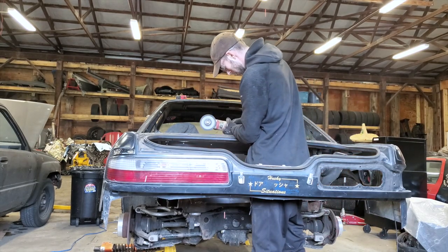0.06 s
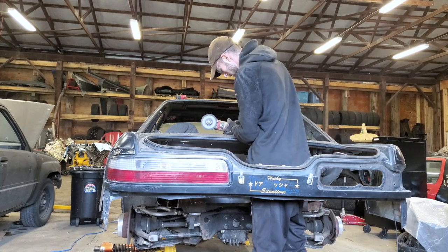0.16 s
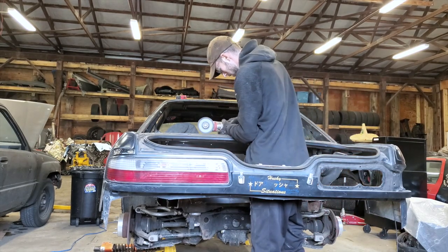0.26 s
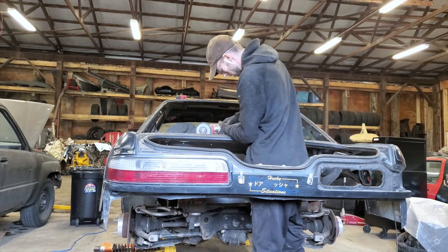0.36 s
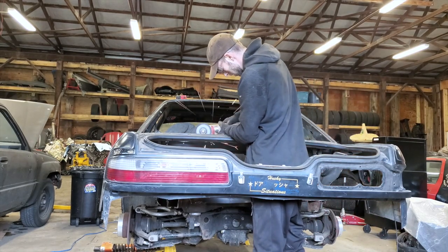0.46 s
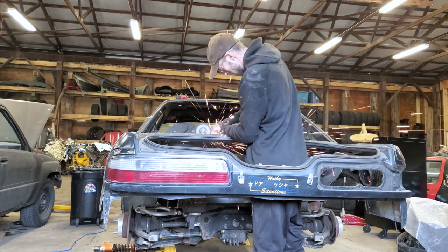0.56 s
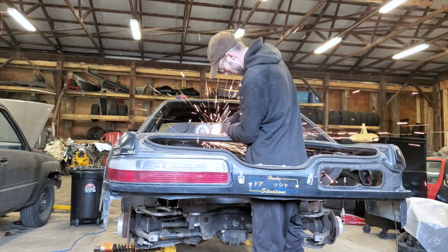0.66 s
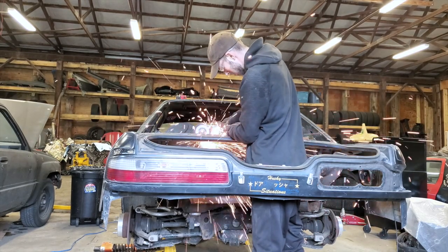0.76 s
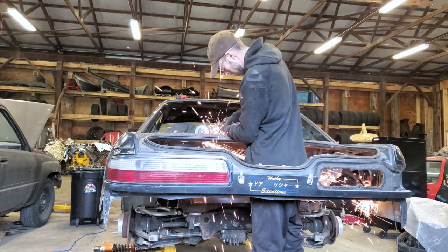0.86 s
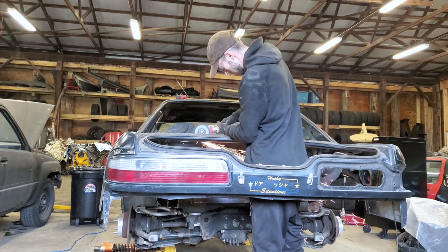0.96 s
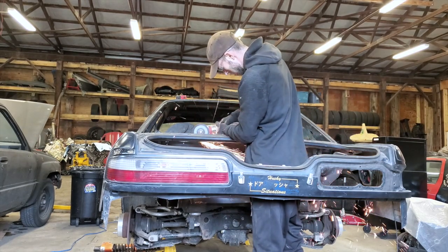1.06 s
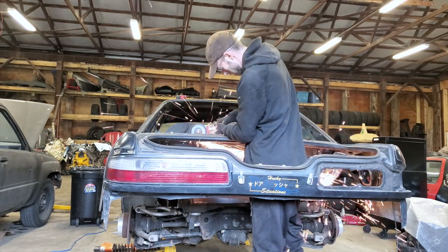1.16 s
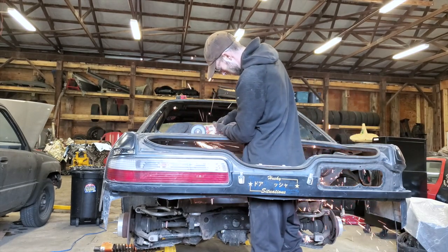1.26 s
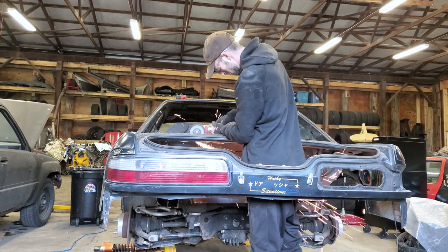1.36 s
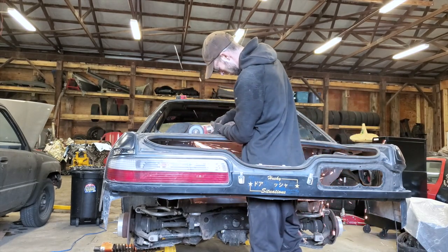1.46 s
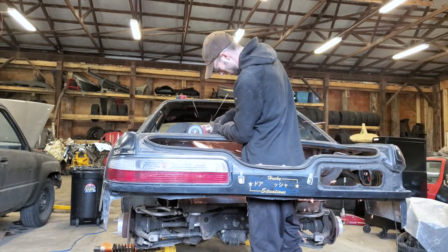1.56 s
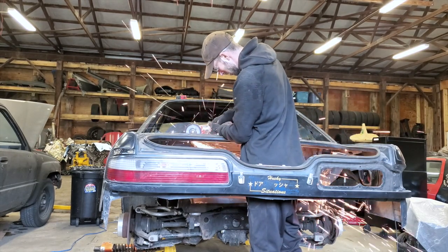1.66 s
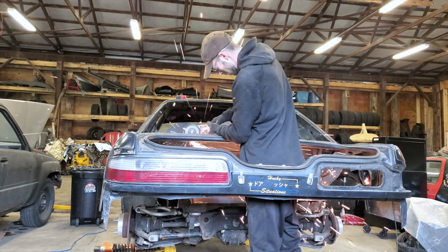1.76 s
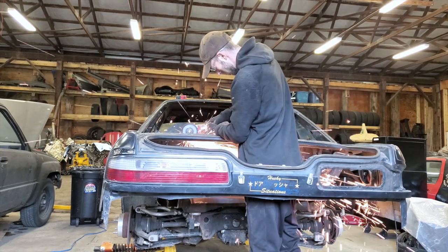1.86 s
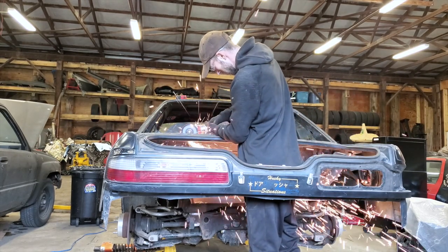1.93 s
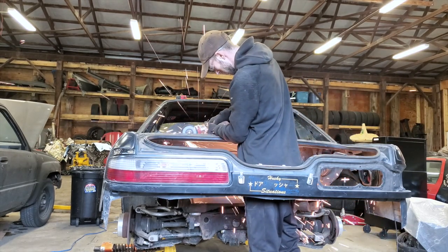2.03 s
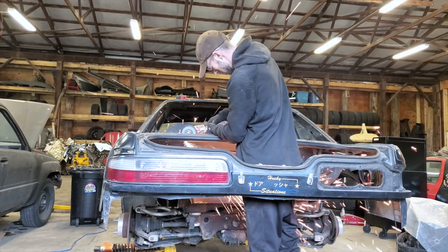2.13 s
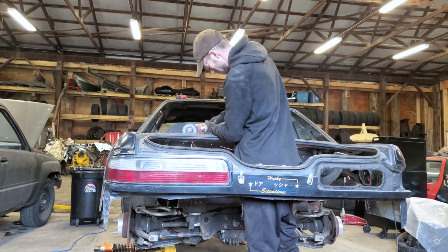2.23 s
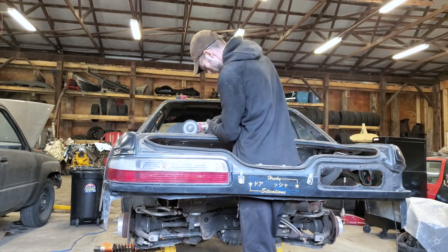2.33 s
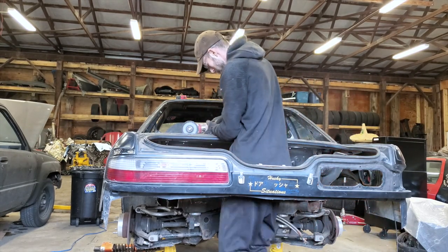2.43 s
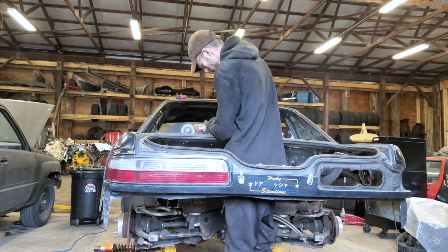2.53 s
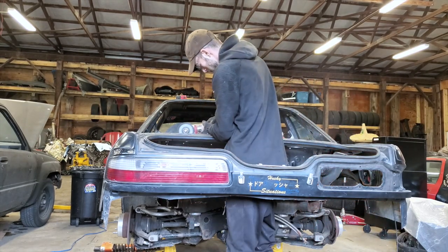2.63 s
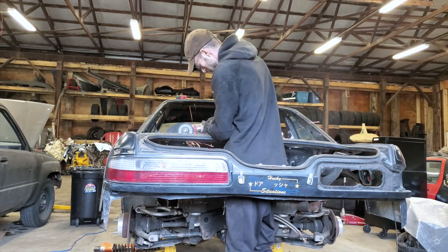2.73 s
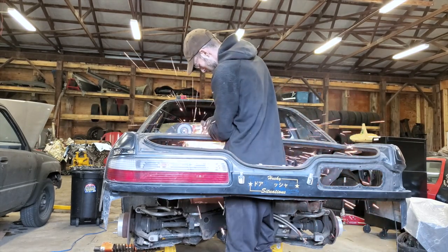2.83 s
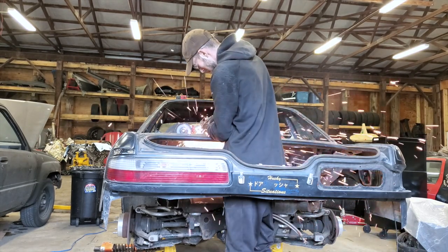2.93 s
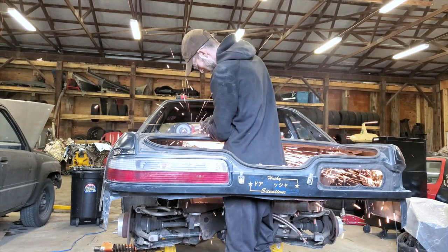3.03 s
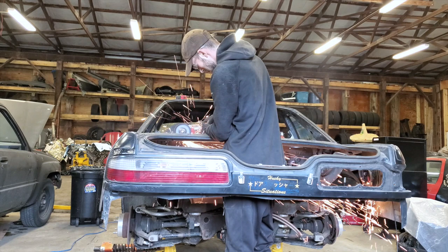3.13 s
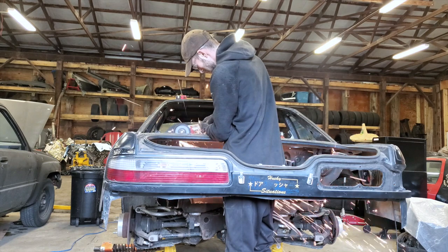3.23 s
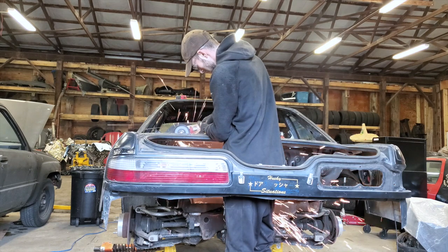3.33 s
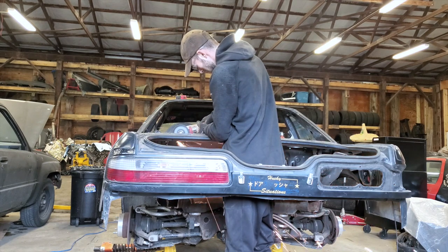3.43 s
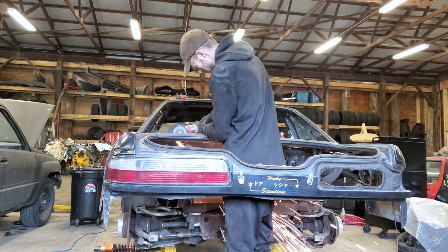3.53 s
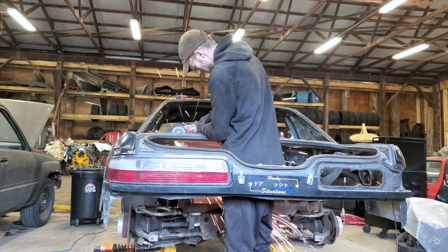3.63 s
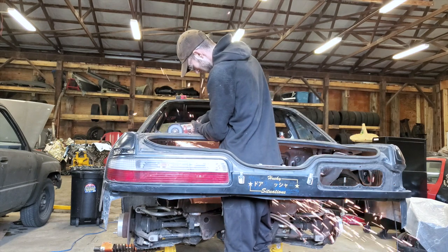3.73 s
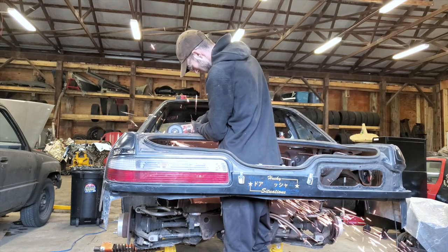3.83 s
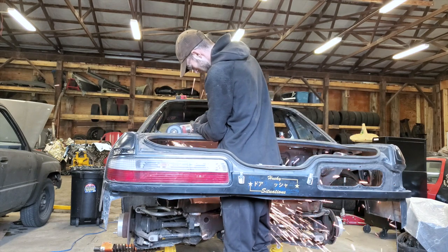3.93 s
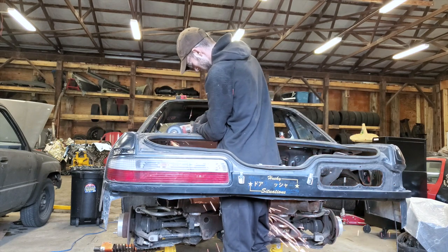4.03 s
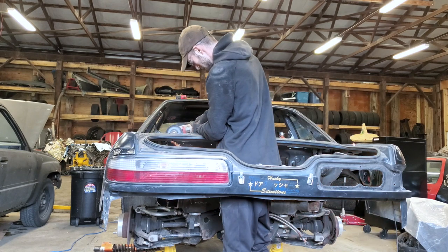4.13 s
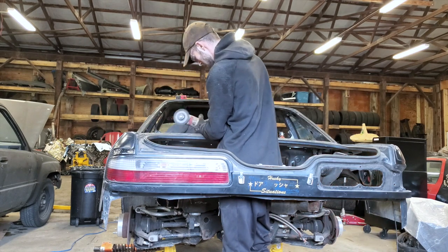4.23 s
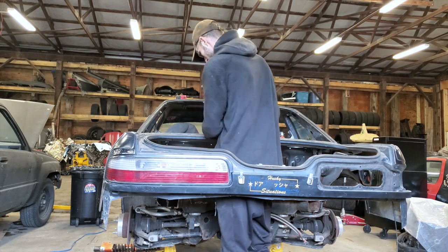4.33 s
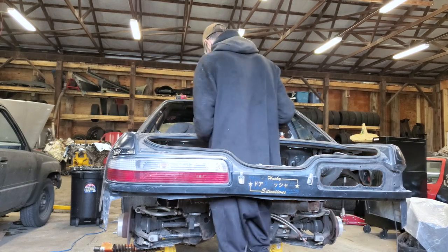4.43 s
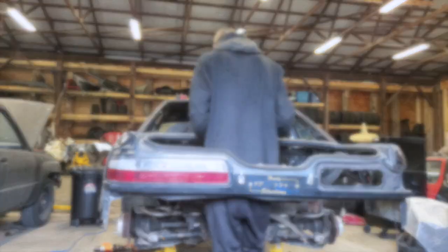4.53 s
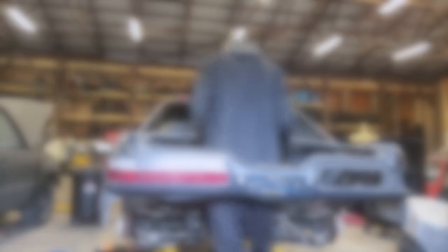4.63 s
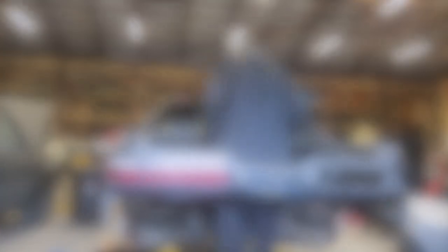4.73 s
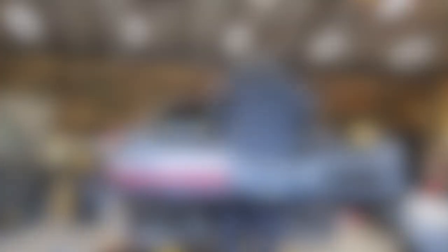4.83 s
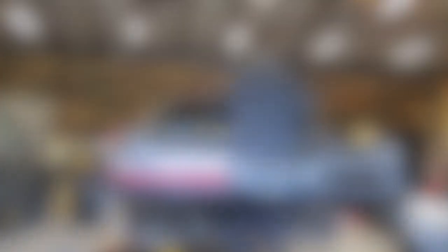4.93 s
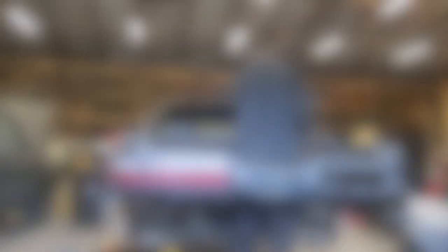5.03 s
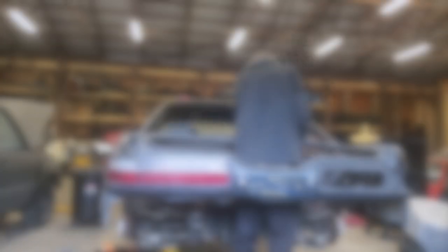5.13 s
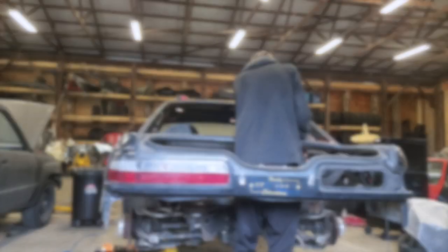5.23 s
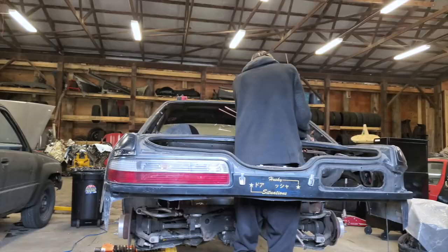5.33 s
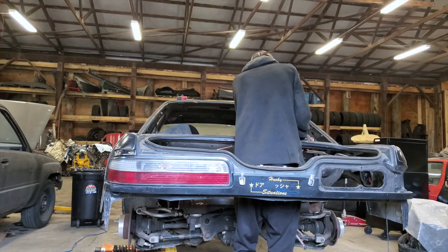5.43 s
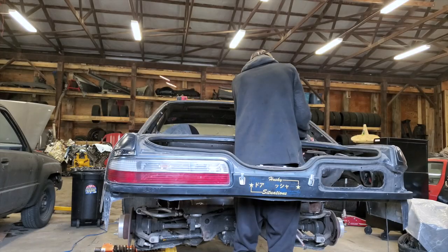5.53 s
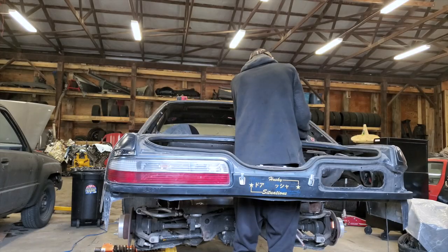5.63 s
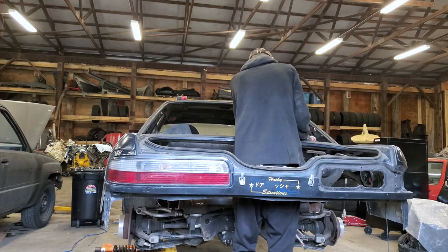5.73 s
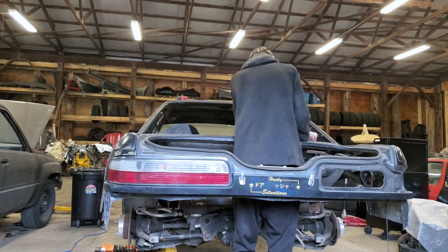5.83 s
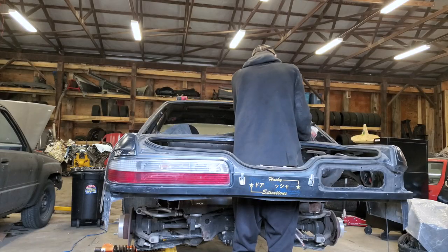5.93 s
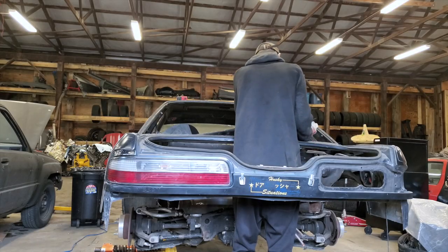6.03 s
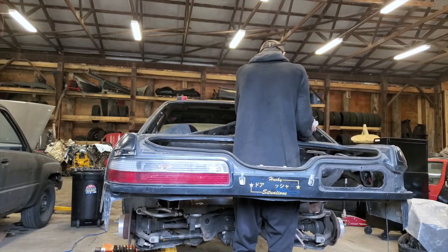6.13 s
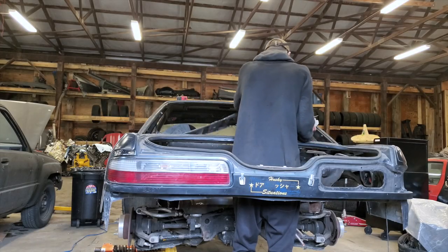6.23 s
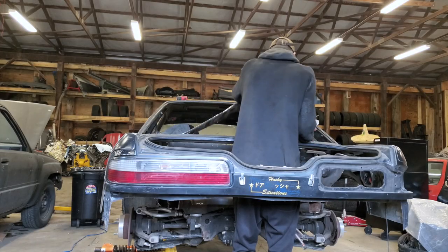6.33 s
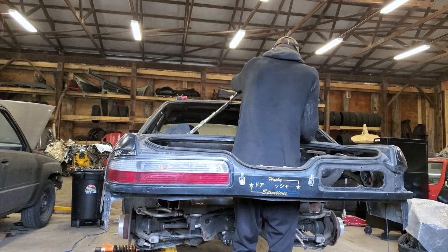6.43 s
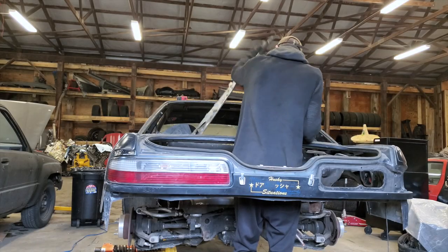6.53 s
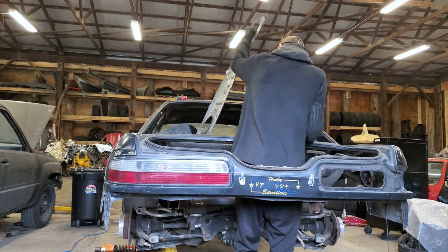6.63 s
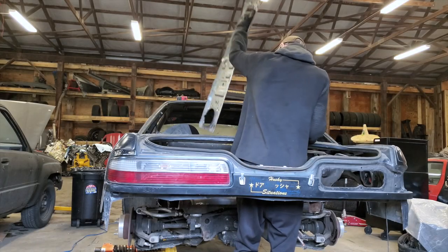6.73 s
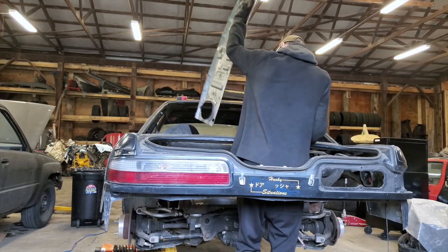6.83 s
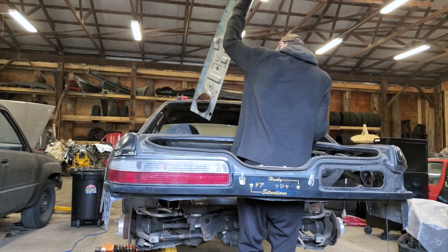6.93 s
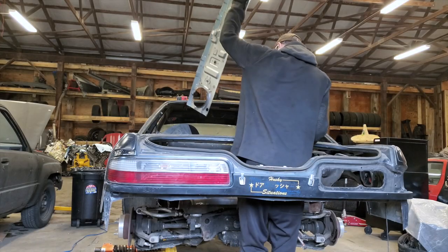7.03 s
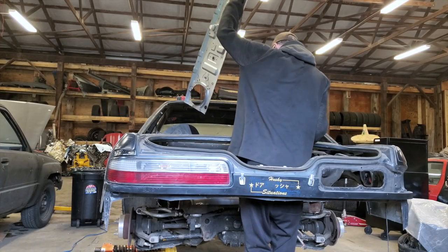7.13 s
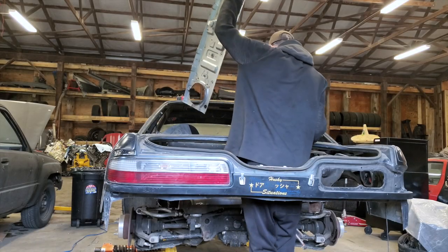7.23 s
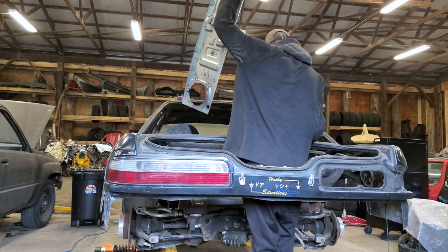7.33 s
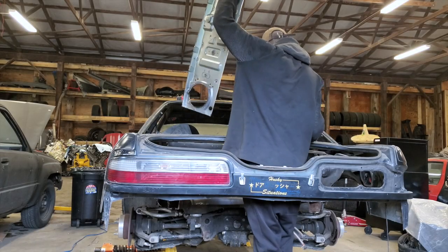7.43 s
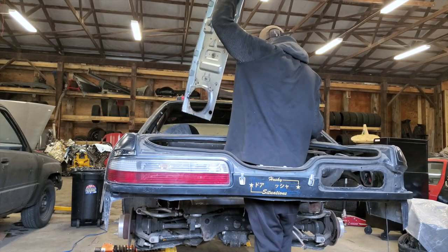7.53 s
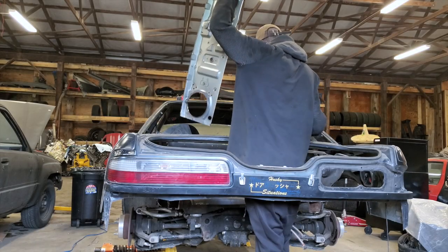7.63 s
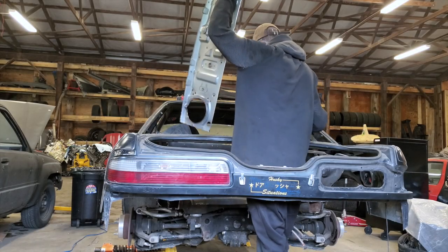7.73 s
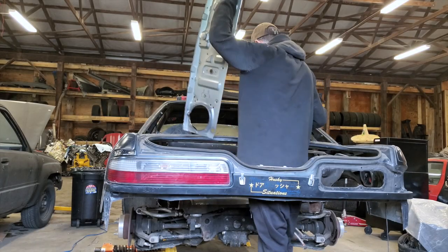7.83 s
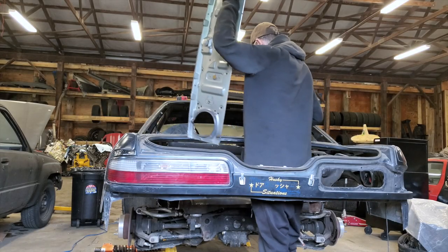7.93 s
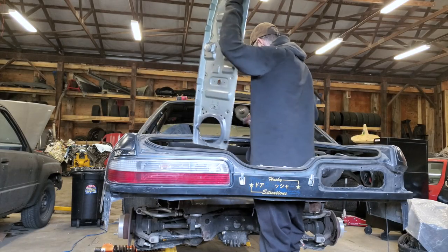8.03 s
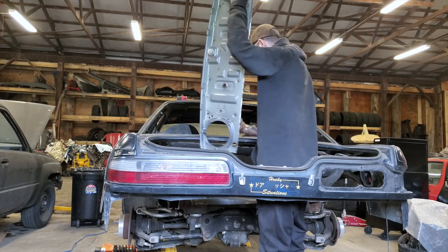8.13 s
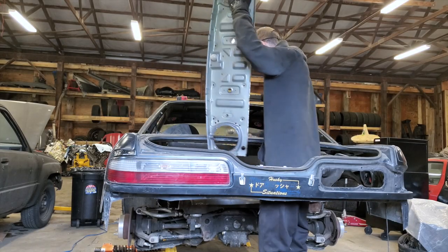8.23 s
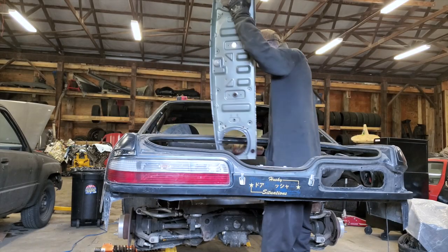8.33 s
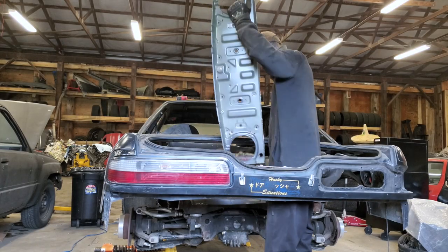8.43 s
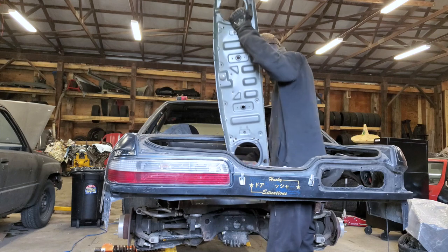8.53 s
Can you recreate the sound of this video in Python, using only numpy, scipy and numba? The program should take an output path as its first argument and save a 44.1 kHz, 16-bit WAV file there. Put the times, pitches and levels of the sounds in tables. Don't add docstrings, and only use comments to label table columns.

```python
import sys
import numpy as np
from scipy import signal
from scipy.fft import rfft, irfft, next_fast_len
from scipy.io import wavfile
from scipy.ndimage import uniform_filter1d, map_coordinates
from numba import njit

SR = 44100
rng = np.random.default_rng(int(sys.argv[2]) if len(sys.argv) > 2 else 0)


def voltage_ratio(decibels):
    exponent = np.asarray(decibels, float) / 20
    return 10 ** exponent


def output_pcm(signal):
    pcm = np.clip(np.atleast_2d(signal).T, -1, 1) * 32767
    wavfile.write(sys.argv[1], SR, np.round(pcm).astype(np.int16))


N = 377937

# start in seconds, disc turns in Hz, pressure as spark level in dB.
QUICK = [
    [(0, 469.8, -16.5), (.12, 500.7, -36), (.29, 445, -35), (.36, 554.7, -26), (.44, 600, -21)],
    [(0.5, 631.3, -17.0), (0.57, 633.5, -14.5), (0.64, 620.9, -19.5), (0.67, 613.2, -18.0),
     (0.79, 539.6, -17.0), (0.91, 504.1, -20.5), (0.94, 503.9, -20.5), (1.01, 546.9, -23.5)],
    [(1.06, 558.0, -22.0), (1.16, 528.3, -22.0), (1.24, 466.1, -20.5), (1.27, 457.6, -21.0),
     (1.33, 464.8, -22.5), (1.36, 503.9, -22.0), (1.41, 522.6, -22.5), (1.45, 524.4, -22.0)],
    [(1.49, 511.5, -23.0), (1.63, 546.5, -24.0), (1.73, 496.8, -22.5), (1.84, 488.6, -24.5),
     (1.97, 440.8, -23.0), (2.07, 461.4, -22.5), (2.21, 454.0, -25.0), (2.26, 463.6, -29.0)],
    [(2.31, 516, -34), (2.53, 642.2, -32.5), (2.61, 660, -22)],
    [(2.66, 654.0, -22.0), (2.81, 644.5, -21.0), (3.01, 504.7, -20.0), (3.16, 456.8, -22.5),
     (3.3, 463.5, -22.0), (3.44, 495.3, -22.0), (3.51, 527.2, -23.0), (3.66, 529.9, -25.5),
     (3.72, 515.4, -24.5)],
    [(3.79, 461.3, -21.5), (3.83, 443.5, -21.5), (3.96, 436.9, -23.0), (4.03, 399.3, -20.5),
     (4.1, 411.8, -24.0), (4.13, 443.0, -25.5), (4.21, 490.3, -28.5), (4.25, 495.4, -30.5)],
    [(4.36, 493, -37.5), (4.52, 450, -35), (4.62, 426.3, -29), (4.79, 420, -31), (4.87, 415, -36)],
]
# start in seconds, disc turns in Hz, pressure as spark level in dB.
SLOW = [
    [(4.5, 171.4, -53.5), (4.73, 166, -31.5), (4.88, 163.5, -27), (5.11, 161.6, -19), (5.21, 159.6, -26),
     (5.4, 157.3, -17.5), (5.63, 152.5, -21), (5.76, 151.3, -42), (5.95, 150, -37)],
]
# frequency in Hz, level in dB per Hz.
QUICK_STEEL = [(150, -41), (250, -23), (467, -27), (509, -13.5), (696, -18), (857, -12), (1420, -10.5),
               (1900, -4.5), (2300, -7.5), (2650, 0.5), (3880, -7), (4300, -4.5), (6640, -9.5), (8910, -3),
               (15800, -6)]
# frequency in Hz, level in dB per Hz.
SLOW_STEEL = [(65, -58), (110, -43), (157, -11.5), (237, -16), (317, -4.5), (360, -15.5), (471, -3),
              (568, -12), (617, -9), (936, -5.5), (1020, -9), (3470, 7.5), (4900, 2), (5600, -9),
              (6400, -3), (8120, -6), (15800, -2)]
# frequency in Hz, width in Hz, level in dB.
QUICK_MODES = [(2730, 150, -3), (3729, 80, -1), (4400, 200, -1), (9120, 920, -20)]
# frequency in Hz, width in Hz, level in dB.
SLOW_MODES = [(8290, 410, 3.6), (11810, 480, 1.75), (14670, 990, 4.74)]
# frequency in Hz, likeness from 0 to 1.
QUICK_ALIKE = [(60, .97), (240, .96), (950, .95), (3770, .76), (8000, .6), (15000, .2)]
# frequency in Hz, likeness from 0 to 1.
SLOW_ALIKE = [(150, .995), (300, .97), (600, .78), (2000, .8), (5500, .9), (9000, .75), (15000, .45)]
# sheet level in dB, its dB per dB of pressure, low level in dB, its dB per dB.
QUICK_LAYERS = (-33, 1.0679, -49, 1.3)
# sheet level in dB, its dB per dB of pressure, low level in dB, its dB per dB.
SLOW_LAYERS = (-32, 0.47, -39.5, 0.4329)
# centre in seconds, length in
# seconds, multiple of disc speed, level in dB.
QUICK_SCREECH = [(.05, .1, 1, -42), (.06, .12, 2, -41),
                 (0.56, 0.18, 16, -27), (0.57, 0.17, 5, -32), (0.57, 0.2, 13, -26), (0.59, 0.26, 4, -31),
                  (0.6, 0.29, 14, -27), (0.68, 0.12, 9, -31), (0.68, 0.18, 3, -36), (0.71, 0.2, 2, -44),
                  (0.71, 0.63, 8, -35), (0.73, 0.12, 13, -29), (0.73, 0.17, 10, -34), (0.75, 0.11, 1, -44),
                  (0.75, 0.12, 6, -33), (0.77, 0.38, 16, -32), (0.78, 0.11, 9, -33), (0.8, 0.18, 14, -25),
                  (0.83, 0.09, 7, -33), (0.96, 0.38, 1, -46), (1.07, 0.36, 2, -48), (1.15, 0.17, 7, -35),
                  (1.27, 0.17, 6, -35), (1.29, 0.14, 7, -32), (1.29, 0.18, 8, -35), (1.39, 0.15, 17, -33),
                  (1.42, 0.18, 16, -31), (1.44, 0.12, 7, -34), (1.49, 0.41, 1, -48), (1.51, 0.17, 5, -35),
                  (1.51, 0.18, 10, -37), (1.58, 0.14, 7, -35), (1.6, 0.21, 4, -41), (1.63, 0.15, 5, -30),
                  (1.76, 0.21, 17, -33), (1.78, 0.2, 5, -33), (1.81, 0.17, 9, -28), (1.82, 0.21, 10, -37),
                  (1.91, 0.11, 8, -38), (1.92, 0.15, 6, -35), (1.94, 0.14, 4, -39), (1.95, 0.11, 9, -33),
                  (1.99, 0.17, 10, -34), (2.01, 0.31, 18, -34), (2.09, 0.22, 9, -36), (2.19, 0.12, 6, -31),
                 (2.75, 0.15, 18, -33), (2.77, 0.16, 15, -31), (2.77, 0.19, 3, -36), (2.77, 0.25, 4, -36),
                 (2.78, 0.25, 2, -48), (2.83, 0.48, 14, -32), (2.92, 0.15, 8, -35), (2.97, 0.28, 5, -32),
                 (2.99, 0.25, 7, -36), (3.02, 0.12, 1, -43), (3.02, 0.18, 11, -32), (3.02, 0.24, 9, -33),
                 (3.03, 0.24, 15, -31), (3.04, 0.22, 10, -28), (3.06, 0.37, 4, -43), (3.15, 0.28, 17, -34),
                 (3.18, 0.13, 10, -34), (3.2, 0.18, 7, -39), (3.31, 0.19, 10, -32), (3.39, 0.21, 16, -32),
                 (3.56, 0.16, 9, -37), (3.59, 0.16, 5, -39), (3.63, 0.57, 1, -47), (3.7, 0.25, 18, -34),
                 (3.73, 0.18, 2, -48), (3.8, 0.13, 6, -35), (3.86, 0.12, 18, -28), (3.87, 0.24, 3, -42),
                 (3.88, 0.12, 10, -31), (3.88, 0.21, 2, -41), (3.93, 0.18, 6, -35), (3.93, 0.27, 1, -49),
                 (3.97, 0.09, 10, -32), (4.03, 0.1, 11, -29), (4.07, 0.18, 2, -42), (4.09, 0.1, 9, -33),
                 (4.11, 0.24, 6, -41), (4.11, 0.27, 3, -44), (4.17, 0.19, 1, -47), (4.2, 0.15, 2, -50)]
# centre in seconds, length in seconds, multiple, level in dB.
SLOW_SCREECH = [(5.1, .25, 2, -43.5), (5.09, .19, 8, -33), (5.1, .22, 7, -36), (5.12, .1, 21, -33),
                (5.27, .25, 15, -38), (5.37, .15, 22, -39), (5.46, .245, 6, -33), (5.58, .15, 5, -38),
                (5.22, .4, 1, -42), (5.43, .3, 1, -48), (5.63, .12, 1, -47), (5.11, .2, 4, -43),
                (5.42, .26, 4, -39), (5.66, .14, 4, -40), (5.13, .3, 3, -43), (5.55, .3, 3, -43),
                (5.38, .12, 9, -40)]
# in at seconds, out at seconds, share repeating each turn 0-1, seating in seconds.
KERF = [
    (-.2, .14, .8, .1),
    (.45, 2.28, .86, .15),
    (2.62, 4.3, .89, .25),
    (4.86, 5.74, .6, .19),
]
# centre in seconds, length in seconds, share of grip lost from 0 to 1.
SLIPS = [
    (1.046, .28, .35),
    (1.362, .1, .25),
    (3.58, .32, .27),
    (4.07, .2, .4),
    (5.24, .15, .35),
]
# time in seconds, frequency in Hz, level in dB.
ROTOR = [
    [(2.33, 520, -56), (2.53, 642, -52), (2.61, 660, -50), (2.78, 650, -52)],
    [(.42, 590, -50), (.5, 631, -45), (.66, 616, -46)],
    [(.07, 1750, -43), (.29, 1290, -60.5), (.36, 1703, -38), (.5, 1890, -38)],
    [(2.27, 1394, -56), (2.36, 1760, -48), (2.5, 1870, -51.5), (2.7, 1960, -45)],
    [(4.24, 1750, -38), (4.34, 1640, -52.5), (4.42, 1457, -51), (4.64, 1060, -60)],
]
# frequency in Hz, level in dB per Hz.
AIR_COLOUR = [(65, -50), (110, -39.5), (147, -17), (342, -16.5), (429, -4), (538, -8.5), (1200, 1.5),
              (2100, -3.5), (3110, -0.5), (5420, -17), (15200, -15.5)]
# time in seconds, effort in dB.
DRAG = [
    (6.2, -39),
    (6.62, -46),
    (7.15, -41),
    (7.85, -38),
    (8.17, -45),
    (8.57, -43.5),
]
# frequency in Hz, width in Hz, level in dB.
PANEL = [
    [(1870, 320, -7.5), (2428.4, 140, 4), (2720, 230, 3), (3430, 730, -9), (4334, 1490, -10)],
    [(413, 239, -7.5), (686, 202, -1.5), (889.3, 120, 1), (1199, 90, -1.5), (1452, 166, -2.5)],
]
# frequency in Hz, width in Hz, level in dB.
FLANGE = [(1000, 250, -4), (1520, 200, 0), (1840, 200, -4), (3700, 700, -4)]
# frequency in Hz, level in dB.
RING = [(893.6, -57.5), (1061, -59), (1179, -46)]
# time in seconds, peak in dB, thud in dB, squeak in dB.
KNOCKS = [(6.657, -29, -40, -35), (7.2888, -23.5, -40.5, -33.5), (7.342, -25, -40, -35),
          (7.3619, -24, -40, -35), (7.7969, -26, -40, -35), (8.0389, -24, -40, -25),
          (8.1252, -26, -40, -35), (8.1651, -24, -40, -30), (7.6689, -22, -18.5, -33),
          (7.8189, -26, -19, -32), (7.8778, -16, -27, -39), (8.075, -21, -31.5, -28),
          (8.1802, -25, -27.5, -8), (8.396, -22, -26, -27), (8.4398, -17.5, -37, -32)]
# time in seconds, level in dB, seconds to fade 10 dB.
SCRAPES = [(6.55, -40, .05), (7.22, -34, .45), (7.82, -36, .05), (7.88, -33.5, .1), (7.98, -38, .05),
           (8.19, -35, .06), (8.3, -38, .08), (8.42, -32.5, .1), (8.55, -35, .1)]
# time in seconds, level in dB, seconds to fade 10 dB.
SCUFFS = [(6.84, -43, .04), (7.19, -42, .1), (7.63, -40, .06), (7.92, -41, .08), (8.09, -42, .05),
          (8.22, -38, .06), (8.46, -39, .1)]
# time in seconds, hum level in dB.
HUM = [
    (4.45, -100),
    (4.75, -72.5),
    (5.4, -71),
    (6.85, -72),
    (7.15, -57),
    (8.57, -47.5),
]
# frequency in Hz, level in dB per Hz.
RUMBLE = [(13, -39), (22, -21), (50, 4.5), (75, 1), (100, -11), (140, -11), (180, -52), (310, -120)]
# frequency in Hz, level in dB per Hz.
SHOP = [(13, -51), (22, -23), (92, -15), (210, -4.5), (249, -5), (306, 1.5), (350, -10.5), (400, -2),
        (520, -9.5), (880, -120)]
# frequency in Hz, time to fade 60 dB in seconds.
HALL = [(150, 0.027), (450, 0.1), (2000, 1), (12000, 0.258)]

FIRM_DB, INERTIA_S = -22, 0.024
SEAT_S, LIFT_S = 0.173, 0.0766
CLEARED_S, CLEARED_DB = 3.616, 4
RATTLE_S, RATTLE_DB = 3.98, 4.5
RIPPLE_DB, RIPPLE_HZ = 4.2, 50
CLEAR, CLEAR_HZ = 0.46, (1700, 7000)
GUARD_HZ, GUARD_WIDTH_HZ = 9700, 1170
BASS_ALIKE_HZ = 700
FAN_ORDER = 39
COAST_S, FAN_HZ, SLOWS_S, COAST_END_S = 5.8, 17410, 2.6, 7.7
WHINE_DB, WHINE_FROM_S, WHINE_FADE_DB_PER_S, WHINE_RISE_DB_PER_S = -44.5, 6.5, 24, 14
AIR_S, AIR_DB, AIR_FADE_DB_PER_S = 5.6, (-34.5, -38), 11
SHOP_HISS_DB, SHOP_BODY_DB = -42, -36.5
STIR = 0.48
EDGE_DB, FLEX_DB = -1.5, 4
CATCH_S = 0.05
RUMBLE_DB, RUMBLE_FOLLOWS = -63, 0.59
DRONE_DB = -72.5
DRONE_LINE = (-2.1, 3, -61, 7.5)
TOP_HZ = 15800


def quick_passes():
    sound = cut(QUICK, QUICK_LAYERS, QUICK_STEEL, QUICK_MODES, QUICK_ALIKE, wear=44, flutter=0.0035,
                uneven_db=1.5, chatter_db=1.5, grit_top_db=-6.5, guard_db=5.5, wobble_db=-14, count=44)
    events = QUICK_SCREECH
    sound = sound + screech(QUICK, events, rough_db=3, apart=0.6)
    sound = sound * np.clip((QUICK[-1][-1][0] - np.arange(N) / SR) / 0.089, 0, 1)
    for rows in ROTOR:
        hz, db = curves(rows)
        sound = sound + voltage_ratio(db - 7 + 4 * wobble(25)) * window(rows, 0.03) * tone(hz, 0.008)
    return placed(sound, pan_db=-1.5, lag=0)


def slow_pass():
    sound = cut(SLOW, SLOW_LAYERS, SLOW_STEEL, SLOW_MODES, SLOW_ALIKE, wear=18, flutter=0.002,
                uneven_db=1.5, chatter_db=1.1, grit_top_db=-1, guard_db=0, wobble_db=-18, count=120)
    sound = sound + screech(SLOW, SLOW_SCREECH, rough_db=2, apart=0.54)
    bite = voltage_ratio(-5 * (np.arange(N) < 4.86 * SR))
    return placed(sound * bite * window(SLOW[0], 0.2), pan_db=-3.7, lag=4)


def cut(strokes, layers, steel, modes, alike, wear, flutter, uneven_db, chatter_db,
        grit_top_db, guard_db, wobble_db, count):
    t = np.arange(N) / SR
    turns_hz, pressure_db = hand(strokes)
    firmness_db = pressure_db - FIRM_DB
    sheet_db = layers[0] + layers[1] * firmness_db
    low_db = layers[2] + layers[3] * firmness_db
    low_db = low_db + CLEARED_DB * np.clip((t - CLEARED_S) / SEAT_S, 0, 1) - sheet_db
    sheet_db = sheet_db + RATTLE_DB * window([[RATTLE_S], [KERF[2][1]]], LIFT_S)
    sparks_db = pressure_db - sheet_db

    share = grip()
    span = (strokes[0][0][0], strokes[-1][-1][0])
    blows = filtered(rim(turns_hz, span, wear, flutter, uneven_db, count), ripple)
    grit = loose_grit(share, grit_top_db, guard_db)
    drive = spread(np.sqrt(share) * blows + np.sqrt(1 - share) * grit, alike)

    def body(hz):
        return voltage_ratio(along(steel, hz)) * (1 + np.abs(resonances(modes)(hz)))

    def part(lo, hi):
        band = filtered(drive, lambda hz: body(hz) * (below(hz, hi) - below(hz, lo)))
        return even(band, size=3000)

    def bounce():
        return chatter_db * (0.364 * wobble(16) + wobble(42))

    mix = voltage_ratio(bounce() - 1.0) * part(1373, 6960)
    mix = mix + voltage_ratio(low_db) * part(10, 1506)
    mix = mix + voltage_ratio(sparks_db + bounce()) * part(5387, 33200)
    once_db = low_db + wobble_db + 4 * wobble(15)
    mix = mix + (0.27 + share) * voltage_ratio(once_db) * tone(turns_hz, 0.0019)
    return voltage_ratio(sheet_db + 0.318 * bounce()) * mix


def loose_grit(share, grit_top_db, guard_db):
    def colour(hz):
        guard = guard_db * np.exp(-((hz - GUARD_HZ) / GUARD_WIDTH_HZ) ** 2)
        return voltage_ratio(grit_top_db * (0.5 - below(hz, 13000)) + guard)

    grit = filtered(rng.standard_normal((2, N)), colour)
    middle = filtered(grit, lambda hz: below(hz, CLEAR_HZ[1]) - below(hz, CLEAR_HZ[0]))
    return grit - CLEAR * share * middle


def rim(turns_hz, span, wear, flutter, uneven_db, count):
    a, b = round(span[0] * SR), round(span[1] * SR)
    hz = (turns_hz * (1 + flutter * wobble(60)))[a:b]
    shape = rng.standard_normal((count, 2, 300)) + 1j * rng.standard_normal((count, 2, 300))
    uneven = uniform_filter1d(rng.standard_normal((count, 1, 300)), size=3) * 1.7
    shape = shape * voltage_ratio(uneven_db * uneven)
    lines = orders(shape, rng.random(count), hz, wear / SR, 2.5 / count, 18000., SR)
    return np.pad(unit(lines) * np.sqrt(18000 / 22050), ((0, 0), (a, N - b)))


@njit
def orders(shape, offset, hz, wear_step, finer, top_hz, rate):
    out, phase = np.zeros((2, len(hz))), 0.
    for n in range(len(hz)):
        phase += 2 * np.pi * hz[n] / rate
        turn, power = np.exp(1j * phase), 1 + 0j
        for k in range(min(len(offset), int(top_hz / hz[n]))):
            power *= turn
            place = n * wear_step * (1 + k * finer) + offset[k]
            j = int(place) % (shape.shape[2] - 1)
            part = place % 1
            for c in range(2):
                out[c, n] += ((shape[k, c, j] * (1 - part) + shape[k, c, j + 1] * part) * power).real
    return out


def screech(strokes, events, rough_db, apart):
    phase = 2 * np.pi * np.cumsum(hand(strokes)[0]) / SR
    tremble, out = rough_db * wobble(35), np.zeros((2, N))
    chances = rng.standard_normal((len(events), 3))
    for (s, length, order, db), (shift, lean, start) in zip(events, chances):
        a, n = round((s - length / 2) * SR), round(length * SR)
        unsteady_db = np.roll(tremble, round(start * SR))[a:a + n]
        swell = np.sqrt(2) * voltage_ratio(db + unsteady_db) * np.hanning(n) ** 0.78
        mean_hz = order * (phase[a + n] - phase[a]) / (2 * np.pi * length)
        side = np.array([[1], [-1]]) * min(mean_hz / BASS_ALIKE_HZ, 1) ** 2
        wave = np.sin(round(order) * phase[a:a + n] + apart * shift * side + start)
        out[:, a:a + n] += swell * voltage_ratio(0.31 * lean * side) * wave
    return out * np.clip(2 * grip() - 0.1, 0, 1)


def hand(strokes):
    hz, pressure_db = curves(sum(strokes, []))
    return uniform_filter1d(hz, size=round(INERTIA_S * SR)), pressure_db


def grip():
    t = np.arange(N) / SR
    held = sum(share * np.clip((t - a) / seat, 0, 1) * np.clip((b - t) / LIFT_S, 0, 1)
               for a, b, share, seat in KERF)
    skid = sum(lost * np.exp(-(2 * (t - s) / length) ** 4) for s, length, lost in SLIPS)
    return np.clip(held * (1 - skid), 0, 1)


def ripple(hz):
    bumps = map_coordinates(rng.standard_normal(500), [hz / RIPPLE_HZ], order=1)
    return voltage_ratio(RIPPLE_DB * (1 - below(hz, 1200)) * bumps)


def panel():
    effort_db, = curves(DRAG)
    roughness = np.array([wobble(350), wobble(120)])[:, None]
    grit = rng.standard_normal((2, 2, N)) * voltage_ratio(3.2 * roughness)

    def struck(noise, modes):
        return spread(filtered(noise, resonances(modes)), [(300, 0.9), (3000, 0.924)])

    edge = 0
    for k in range(2):
        shifted = np.roll(grit[0], k * SR, axis=1)
        edge = edge + voltage_ratio(FLEX_DB * wobble(9)) * struck(shifted, PANEL[0][k::2])
    edge = unit(edge)
    belly = unit(struck(grit[1], PANEL[1]))
    flange = unit(struck(grit[0, :, ::-1], FLANGE))

    rub = np.sqrt(voltage_ratio(effort_db + EDGE_DB) ** 2 + catching(SCRAPES)) * edge
    rub = rub + voltage_ratio(effort_db) * belly + np.sqrt(catching(SCUFFS)) * flange
    rub = voltage_ratio(-1.5) * rub * np.clip((np.arange(N) / SR - DRAG[0][0]) / 0.765, 0, 1)
    ring = sum(voltage_ratio(db + 4.1 * wobble(9)) * tone(np.full(N, hz), 0.00399) for hz, db in RING)
    ring = ring * window([[6.75], [7.8]], 0.052)
    return placed(rub + ring + knocks(), pan_db=-1.6, lag=1)


def knocks():
    cracks, hits = np.zeros(N + SR), np.zeros(N + SR)
    t = np.arange(SR // 4) / SR
    for s, db, thud_db, squeak_db in KNOCKS:
        here = slice(round(s * SR), round(s * SR) + len(t))
        cracks[here] += voltage_ratio(db + 6.0 - 60 * t / 0.0143) * rng.standard_normal(len(t))
        thud = np.sin(2 * np.pi * 375 * t) + np.sin(2 * np.pi * 315 * t)
        thud = voltage_ratio(thud_db - 60 * t / 0.425) * thud
        jitter = 0.108 * np.cumsum(rng.standard_normal(len(t)))
        squeak = voltage_ratio(squeak_db - 60 * t / 0.26) * np.sin(2 * np.pi * 7400 * t + jitter)
        breath = voltage_ratio(squeak_db - 0.5 - 60 * t / 0.3) * np.diff(rng.standard_normal(len(t) + 1))
        hits[here] += voltage_ratio(db - 5.0) * (thud + squeak + breath)
    return hits[:N] + filtered(cracks[:N], resonances(PANEL[0]))


def catching(rows):
    t = np.arange(N) / SR
    return sum(voltage_ratio(db - 10 * np.maximum((t - s) / fade, (s - t) / CATCH_S)) ** 2 for s, db, fade in rows)


def coasting():
    t = np.arange(N) / SR
    hz = FAN_HZ * np.exp(-(t - COAST_S) / SLOWS_S)
    late = t - WHINE_FROM_S
    db = WHINE_DB - np.maximum(WHINE_FADE_DB_PER_S * late, -WHINE_RISE_DB_PER_S * late)
    whine = voltage_ratio(db + 2 + 3.5 * wobble(30)) * tone(hz, 0.005)
    rotor = voltage_ratio(-60 - 5 * (t - COAST_S) + 3 * wobble(6)) * tone(hz / FAN_ORDER, 0.01)
    motor = (whine + rotor) * window([[COAST_S], [COAST_END_S]], 0.1)
    return placed(cooling_air() + motor, pan_db=-3.1, lag=5)


def cooling_air():
    t = np.arange(N) / SR
    hiss_gain, body_gain = voltage_ratio(np.array(AIR_DB)[:, None] - AIR_FADE_DB_PER_S * (t - AIR_S).clip(0))
    effort_db, = curves(DRAG)
    draught = spread(rng.standard_normal((2, N)), [(200, 0.996), (800, 0.458), (8000, 0.06)])
    hiss = unit(filtered(draught, lambda f: voltage_ratio(along(AIR_COLOUR, f)) * (1 - below(f, 3890))))
    body = unit(filtered(draught, lambda f: voltage_ratio(along(AIR_COLOUR, f)) * below(f, 5720)))
    stirred = voltage_ratio(SHOP_BODY_DB + STIR * (effort_db - effort_db.max()))
    air = np.hypot(hiss_gain, voltage_ratio(SHOP_HISS_DB)) * hiss + np.hypot(body_gain, stirred) * body
    return voltage_ratio(0.32 * wobble(11)) * air * np.clip((t - AIR_S) / 0.219, 0, 1)


def compressor():
    t = np.arange(N) / SR
    line_db, = curves(HUM)
    rumble_db = RUMBLE_DB + RUMBLE_FOLLOWS * (line_db + 70)

    def bass(colour):
        noise = spread(rng.standard_normal((2, N)), [(50, 0.957)])
        return unit(filtered(noise, lambda f: voltage_ratio(along(colour, f))))

    near = voltage_ratio(line_db - 0.5 + 1.0 * wobble(3.8)) * tone(np.full(N, 78.), 0.00403)
    near = near + voltage_ratio(rumble_db + 3 * wobble(4)) * bass(RUMBLE)
    on, off, last_db, climb = DRONE_LINE
    drone_line_db = last_db - climb * (off - t)
    early = voltage_ratio(drone_line_db - 4.0 + 0.87 * wobble(9.5)) * tone(np.full(N, 318.), 0.00404)
    early = early * window([[on], [off]], 0.033) + voltage_ratio(DRONE_DB + 6.5) * bass(SHOP)
    swap = np.clip((t - 4.45) / 0.39, 0, 1)
    return swap * near + (1 - swap) * early


def hall(x, shrink):
    hz, t, z = signal.stft(rng.standard_normal((2, SR)), SR, nperseg=256)
    fading = voltage_ratio(-60 * t * shrink / along(HALL, hz)[:, None])
    tail = signal.istft(z * fading, SR, nperseg=256)[1]
    tail = tail / np.linalg.norm(tail, axis=1, keepdims=True)
    return signal.fftconvolve(x, tail, axes=1)[:, :N]


def resonances(modes):
    def response(f):
        total = 0
        for k, (centre, width, db) in enumerate(modes):
            damping = 1j * f * width
            total = total + (-1) ** k * voltage_ratio(db) * damping / (centre * centre - f * f + damping)
        return total
    return response


def tone(hz, drift):
    return np.sqrt(2) * np.sin(2 * np.pi * np.cumsum(hz * (1 + drift * wobble(25))) / SR)


def wobble(rate):
    knots = rng.standard_normal(int(N * rate / SR) + 4)
    return map_coordinates(knots, [np.arange(N) * rate / SR], order=1)


def spread(pair, alike):
    def mid_side(hz):
        turn = np.arccos(np.clip(along(alike, hz), -1, 1)) / 2
        return np.array([np.cos(turn), np.sin(turn)])

    mid, side = filtered(pair, mid_side)
    return np.array([mid + side, mid - side])


def placed(x, pan_db, lag):
    def tilt(hz):
        level = voltage_ratio(pan_db / 2 * hz ** 2 / (hz ** 2 + 450 ** 2))
        return level * np.exp(-1j * np.pi * hz * lag / SR)

    return filtered(x, lambda hz: np.array([tilt(hz), 1 / tilt(hz)]))


def filtered(x, response):
    m = next_fast_len(N + 8192)
    return irfft(rfft(x, m) * response(np.fft.rfftfreq(m, 1 / SR)), m)[..., :N]


def below(hz, edge):
    return 1 / (1 + (hz / edge) ** 6)


def along(points, hz):
    f, v = np.transpose(points)
    return np.interp(np.log(hz + 1), np.log(f + 1), v)


def curves(rows):
    s, *cols = np.transpose(rows)
    return [np.interp(np.arange(N) / SR, s, c) for c in cols]


def window(rows, fade):
    t = np.arange(N) / SR
    return np.clip((t - rows[0][0]) / fade, 0, 1) * np.clip((rows[-1][0] - t) / fade, 0, 1)


def unit(x):
    return x / np.sqrt(np.mean(x ** 2) + 1e-20)


def even(x, size):
    return x / np.sqrt(np.abs(uniform_filter1d(np.mean(x ** 2, axis=0), size)) + 1e-12)


def scene():
    quick, work = quick_passes(), slow_pass() + panel()
    quick = voltage_ratio(-1) * quick + voltage_ratio(-8.5) * hall(quick, shrink=4)
    work = work + voltage_ratio(-5.5) * hall(work, shrink=1.0)
    return quick + work + coasting() + compressor()


def band_limit(x):
    return signal.sosfilt(signal.butter(12, 16800, fs=SR, output="sos"), x)


def record(dry):
    mix = filtered(dry, lambda hz: hz < TOP_HZ)
    return band_limit(mix)


dry = scene()
out = record(dry)
output_pcm(out)
```